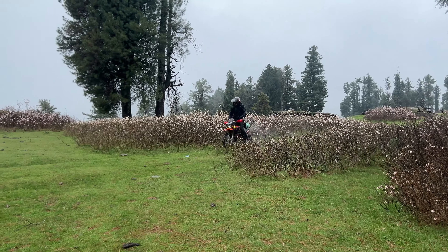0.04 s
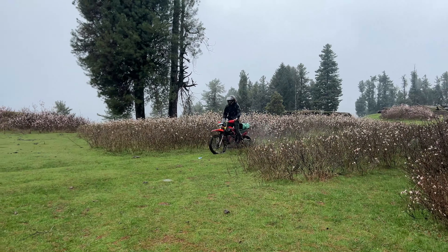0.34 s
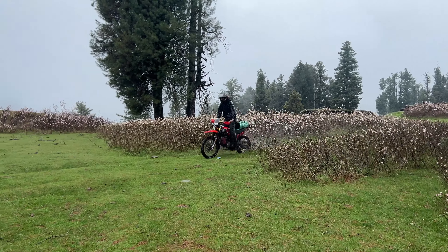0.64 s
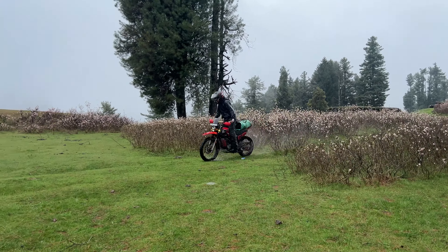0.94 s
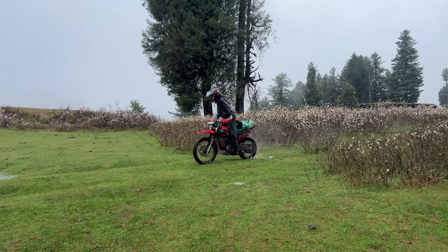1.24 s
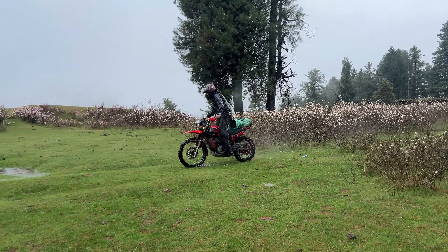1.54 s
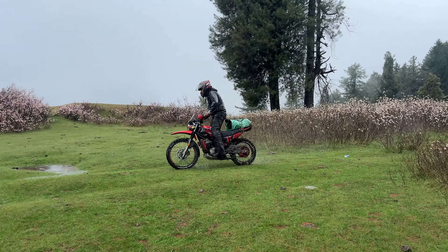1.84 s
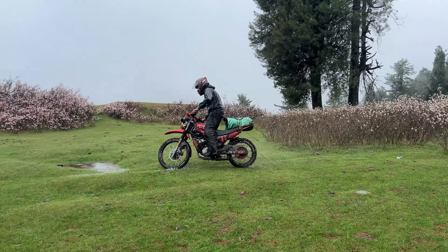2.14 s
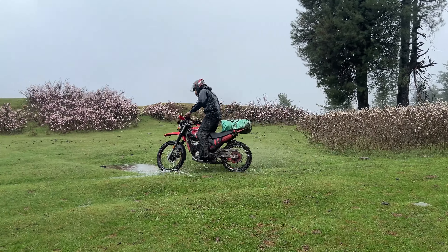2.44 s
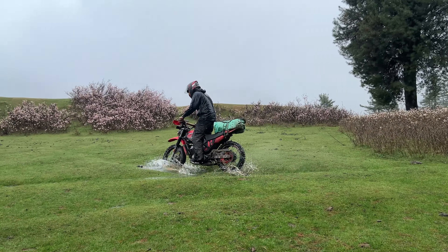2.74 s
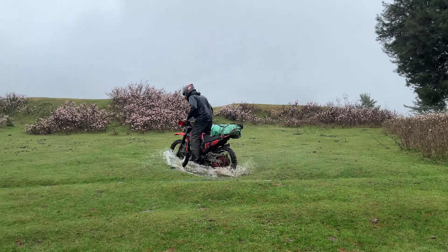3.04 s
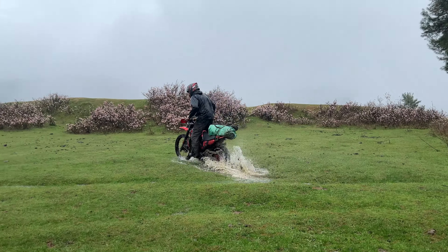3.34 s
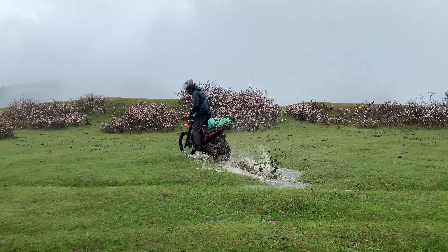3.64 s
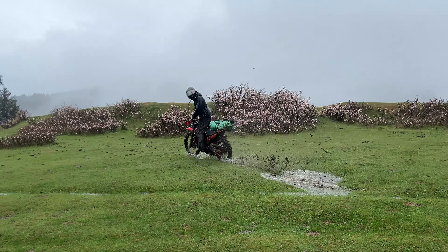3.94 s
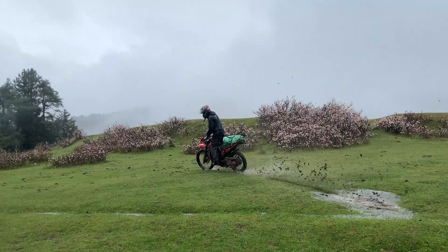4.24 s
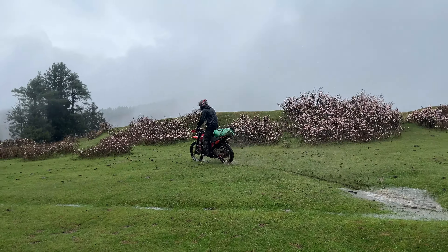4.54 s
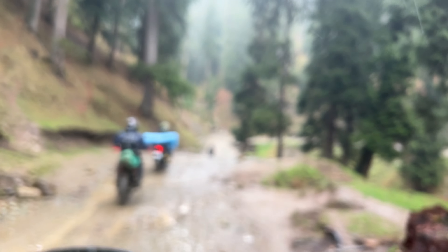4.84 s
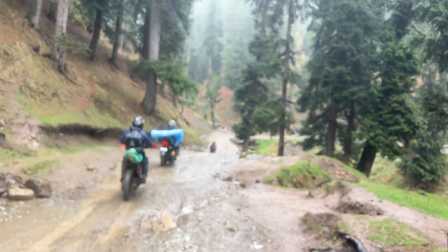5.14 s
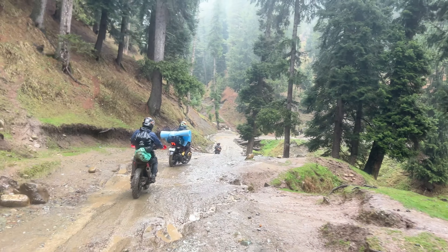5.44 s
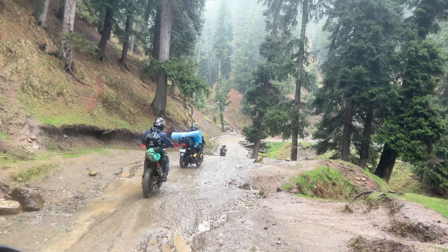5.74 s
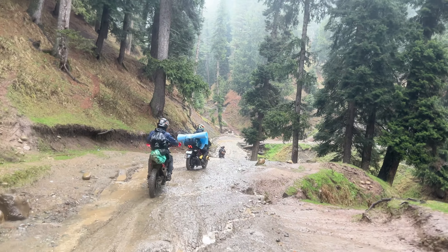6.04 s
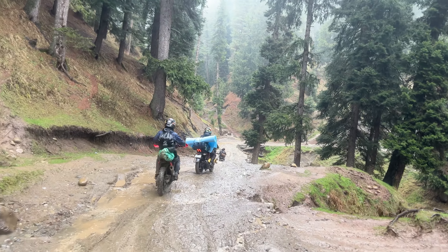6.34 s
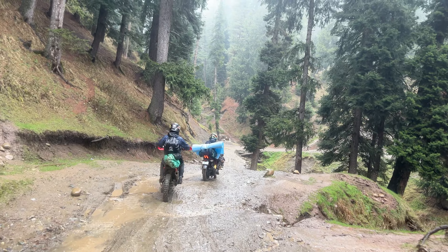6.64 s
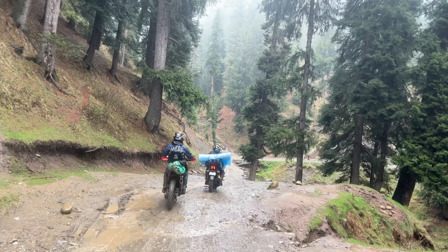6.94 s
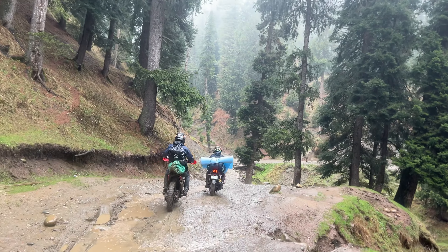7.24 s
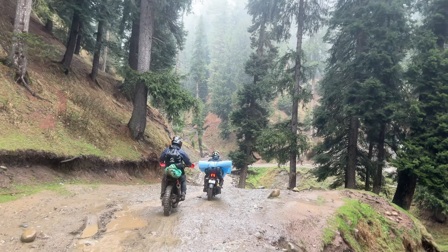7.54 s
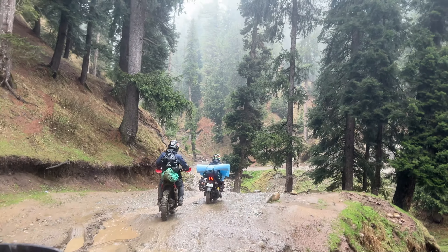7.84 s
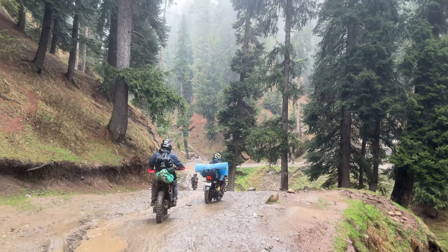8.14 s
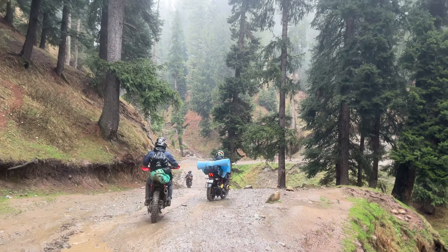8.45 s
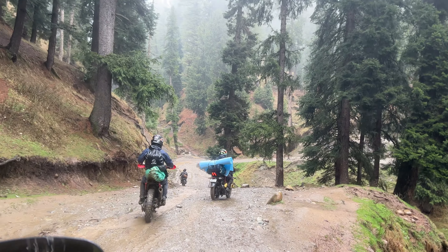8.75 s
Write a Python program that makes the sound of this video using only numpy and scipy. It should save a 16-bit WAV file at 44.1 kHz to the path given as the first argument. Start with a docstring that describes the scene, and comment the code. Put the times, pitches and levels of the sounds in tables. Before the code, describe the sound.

A dirt bike blips its throttle and revs hard through a puddle, then quieter motorcycles chug along a wet, stony trail.

```python
"""A meadow: a single-cylinder trail bike blips its throttle, opens up through a puddle and rolls off.
Then a stony forest trail: a bike plods along while another idles close by, and stones knock under
the tyres over a wash of water and wet gravel. Every firing is a puff that the silencer smears into
a quick downward chirp; an open throttle adds a sharp crack, a throaty growl and a metallic rasp."""
import sys
import numpy as np
from scipy import signal
from scipy.fft import rfft, irfft
from scipy.io import wavfile
from scipy.ndimage import uniform_filter1d

SR = 44100
rng = np.random.default_rng(int(sys.argv[2]) if len(sys.argv) > 2 else 0)


def wav_record(signal):
    """Record a signal, one row per channel, as 16-bit PCM in the file named by sys.argv[1]."""
    frames = np.transpose(np.atleast_2d(signal))
    bounded = np.clip(frames, -1, 1)
    # unit amplitude maps onto the largest positive 16-bit level
    quanta = np.round(bounded * 32767).astype(np.int16)
    wavfile.write(sys.argv[1], SR, quanta)


N = 396900
TIME, HZ = np.arange(N) / SR, np.fft.rfftfreq(N, 1 / SR)
TRAIL_AT_S, TRAIL_EASE_S = 4.644, 5.58  # the trail scene starts; its plodding bike eases off

# Twists of the throttle: (opens [s], shuts [s], opening rate [firings/s], shutting rate [firings/s],
# load [dB], hot-gas pitch lift [share], extra boom [dB])
THROTTLE_TWISTS = [(-0.1, 0.369, 31.87, 30.74, -11, .1, 4.5), (0.767, 0.971, 19.7, 37.01, -20, 0.015, 0.5),
                   (1.15, 1.371, 33.99, 29.28, -21, .06, 1), (1.638, 1.855, 20.87, 35.12, -8, .09, 3.5),
                   (2.084, 2.275, 26.39, 26.49, -12, .035, 4), (2.452, 2.601, 20.67, 27.4, -9, .045, 2.5),
                   (2.742, 4.065, 23.24, 70.69, 0, .067, 0)]
def throttle(t):
    """The rider's hand at times t: opening 0-1, then the load, lift and boom of the latest twist."""
    late_s, open_s, shut_s = 0.0046, 0.024, 0.022  # the exhaust answers a little late
    opening = sum(ramp(t, opens + late_s, open_s) - ramp(t, shuts + late_s, shut_s)
                  for opens, shuts, *_ in THROTTLE_TWISTS)
    starts, _, _, _, *character = np.transpose(THROTTLE_TWISTS)
    return opening, *np.array(character)[:, np.searchsorted(starts, t) - 1]

# Revs through the last, long pull and the coast after it: (time [s], rate [firings/s])
LONG_PULL_REVS = [(2.888, 36.12), (2.97, 39.56), (3.05, 41.75), (3.13, 47.68), (3.21, 52.63), (3.3, 51.52),
                  (3.38, 53.99), (3.46, 56.36), (3.56, 60.64), (3.7, 68.54), (3.74, 69.28), (3.84, 72.49),
                  (3.94, 75.73), (4.01, 73.03), (4.13, 65.13), (4.2, 59.58), (4.28, 54.33), (4.38, 48.1),
                  (4.5, 42.38), (4.64, 36.4)]
def meadow_revs():
    """The meadow bike's rev curve: straight lines between throttle moves, then the long pull."""
    opens, shuts, opening_rate, shutting_rate, *_ = np.transpose(THROTTLE_TWISTS)
    return sorted([*zip(opens, opening_rate), *zip(shuts, shutting_rate), *LONG_PULL_REVS])

# The silencer's low, middle and upper voices: (frequency [Hz], level [dB])
BOOM_EQ = [(20, -52.5), (36, -26), (52, 0.5), (75, -2), (105, 8), (130, -5.5), (170, -30), (300, -80)]
BODY_EQ = [(55, -28), (105, -1.5), (150, 12.5), (210, 12), (250, -0.5), (295, -44.5), (380, -54.5),
           (700, -75)]
BARK_EQ = [(150, -26), (250, 8.5), (300, 0), (370, 0.5), (490, -10), (630, -7.5), (760, -38.5),
           (1300, -59.5)]
# Exhaust mix, throttle open and shut: (rate [firings/s], boom [dB], body [dB], bark [dB], crack [dB])
OPEN_MIX = [(24.2, -19.5, -21, -23, -36.5), (30.5, -22.5, -15.5, -21, -35.5), (36.5, -43, -12.5, -23, -29),
            (40.9, -19, -12.5, -21.5, -25), (54.1, -17.5, -15.5, -19, -19.5),
            (51.2, -22.5, -17.5, -19.5, -24), (69, -14.5, -19.5, -23, -22.5)]
SHUT_MIX = [(21.4, -23, -23.5, -64.5, -75.5), (27.4, -16.5, -23.5, -41.5, -68.5),
            (39.6, -24, -19.5, -54.5, -63), (46.3, -29.5, -17.5, -34, -52.5),
            (65.7, -31.5, -18.5, -31, -34)]
# Off the throttle the note sinks with the revs: (rate [firings/s], pitch lift [share])
OVERRUN_LIFT = [(22, -0.052), (36, 0.0033), (48, 0.039), (68, 0.22)]
# At first the bike sounds thin and faint; its bass drops away, then returns:
# (time [s], low cut [Hz], level [dB])
BASS_THINNING = [(0.0, 62, -13), (0.2, 244, -9.5), (0.39, 380, -7.5), (0.58, 364, -3.5), (0.68, 120, -14.5),
                 (0.78, 133, -12.5), (0.86, 55, 3), (1.3, 115, -1.5), (1.7, 19, -0.5)]
def exhaust(s, rate, pop_s=4.085, pop_fade_s=0.026, ease_s=3.964, misfire_s=4.16):
    """Revs and throttle voice each firing; returns the mono pipe note and the stereo crack."""
    opening, load_db, hot_lift, boom_db = throttle(s)
    shut = 1 - opening
    mix_db = opening * np.array(follow(OPEN_MIX, rate)) + shut * np.array(follow(SHUT_MIX, rate))
    boom, body, bark, crack_db = mix_db
    cut_hz, thin_db = follow(BASS_THINNING, s)
    blipping = opening * (s < THROTTLE_TWISTS[-1][0])
    cut_hz = np.maximum(cut_hz, 102 * blipping)  # short blips lack the deepest bass
    pop = (s > pop_s) * np.exp(-abs(s - pop_s) / pop_fade_s)  # hollow pop as the throttle snaps shut
    lift = opening * hot_lift + shut * (follow(OVERRUN_LIFT, rate)[0] + 0.038 * pop)
    uneven_db = np.interp(rate, [22, 55], [1.0, .4])  # firing steadies with speed
    lag_scale = np.interp(rate, [22, 36, 70], [1.05, .97, .85])  # hot gas carries sound faster
    fader_db = thin_db - 5.5 * ramp(s, ease_s, pop_s - ease_s) * (s < pop_s)  # the pull slackens
    misfire_db = -9 * (np.arange(len(s)) == np.searchsorted(s, misfire_s))  # one firing nearly fails
    voices_db = np.array([boom + opening * boom_db, body + 2 * pop, bark + opening * load_db + 2 * pop])
    voices_db += fader_db + misfire_db
    pipe = silencer(s, rate, voices_db, (BOOM_EQ, BODY_EQ, BARK_EQ), uneven_db, lag_scale, lift, cut_hz)
    blow_db = fader_db + 2.7 * load_db
    sharp = crack(s, rate, blow_db + crack_db)
    drive_db = blow_db - 28 * shut  # the pipe grows quiet once the throttle shuts
    for layer in (growl, throat, spit, bray):
        pipe += layer(s, rate, drive_db)
    return pipe, sharp

# The silencer lets low notes out late: (frequency [Hz], base delay [ms])
SILENCER_LAG = [(50, 15.22), (100, 22.7), (140, 9.9), (210, 7.7), (320, 3.55), (500, 1.58), (900, 1.1)]
def silencer(times, rates, levels_db, voices, uneven_db, lag_scale, lift, cut_hz, size=4096):
    """Each firing excites three broad resonances; low notes lag, so the puff chirps downward."""
    hz, out = np.fft.rfftfreq(size, 1 / SR), np.zeros(N)
    shapes = np.array([amp(read(voice, hz)) for voice in voices])
    shapes /= np.sqrt(2 * (shapes ** 2).sum(1, keepdims=True) / size)
    phase = 2 * np.pi * np.cumsum(read(SILENCER_LAG, hz) / 1000) * hz[1]
    chance = rng.standard_normal((len(times), 4))
    wobble_db = np.reshape(uneven_db, (-1, 1)) * (chance[:, :1] + .5 * chance[:, 1:])
    gains = amp(np.transpose(levels_db) + wobble_db)
    per_firing = np.broadcast_arrays(times, rates, lag_scale, lift, cut_hz)
    for gain, s, rate, lag, up, cut in zip(gains, *per_firing):
        spectrum = np.interp(hz / (1 + up), hz, gain @ shapes)
        spectrum /= np.sqrt(1 + (cut / (hz + 1)) ** 8)  # low cut
        puff = np.roll(irfft(spectrum * np.exp(-1j * lag * phase)), size // 4)
        add(out, s - size / 4 / SR, puff * np.sqrt(SR / rate))
    return out

# How much of the burst is jet noise: (rate [firings/s], turbulence [share])
JET_SHARE = [(28, 0.6), (39, 0.7), (50, 0.61), (72, 0.07)]
def blowdown(times, rates, levels_db, decay_cycles=0.16, echo=0.27, uneven_db=.5):
    """The exhaust valve opens: a shock that scatters alike each time, and a jet of fresh turbulence."""
    ms, out = np.arange(1024) * 1000 / SR, np.zeros(N)
    shock = rng.standard_normal(len(ms)) * np.exp(-ms / 1.74)
    for _ in range(12):  # the pipe smears the shock briefly and leaves its spectrum flat
        scatter = rfft(shock)
        shock = irfft(scatter / abs(scatter)) * np.exp(-ms / 8)
    for s, rate, db, rough in zip(times, rates, levels_db, *follow(JET_SHARE, rates)):
        decay_ms = 1000 * decay_cycles / rate
        age = ms / decay_ms
        jet = unit(rng.standard_normal(len(ms)) * np.sqrt(age) * np.exp(-age))
        second_shock = echo * np.interp(ms - 1.1 * decay_ms, ms, shock, left=0)
        burst = np.sqrt(1 - rough) * unit(shock + second_shock) + np.sqrt(rough) * jet
        jitter_ms = .045 * rng.standard_normal()  # uneven combustion blurs the top harmonics
        start = s + (jitter_ms - .65 * decay_ms) / 1000
        gain = amp(db + 1 + uneven_db * rng.standard_normal())
        add(out, start, gain * burst * np.sqrt(SR / rate / len(ms)))
    return out

# The rough edge of the exhaust note: (frequency [Hz], level [dB])
CRACK_EQ = [(280, -21.5), (500, -3), (660, -1), (830, -9), (1020, -21), (1320, 3), (1620, -4.5),
            (1860, -1.5), (2060, -5), (2300, -10), (2900, -12), (3500, -12.5), (4200, -13.5), (5100, -27),
            (6400, -41), (9400, -36.5), (13000, -33.5), (16000, -27.5)]
def crack(times, rates, levels_db, trim_db=-2.5):
    """Two trains of blow-down shocks, coloured by the pipe and spread wide."""
    trains = [blowdown(times, rates, levels_db) for _ in range(2)]
    return diffuse(*[amp(trim_db) * colour(shocks, CRACK_EQ) + rasp(shocks) for shocks in trains])

# Metallic rings of the exhaust: (time [s], lower [Hz], level [dB], upper [Hz], level [dB])
RASP_SWEEP = [(3.1, 3250, -7, 4630, -4), (3.33, 3930, 3, 4600, 4), (3.48, 3610, 8, 4900, -17),
              (3.62, 3780, 2, 4670, 2), (3.78, 3440, 0.5, 4820, 3), (3.92, 3730, 12, 5030, 4.5),
              (4.03, 4000, -3, 5000, -14)]
def rasp(shocks, widths_hz=(520, 750)):
    """The shocks excite two metallic resonances that shift and swell through the long pull."""
    lower_hz, lower_db, upper_hz, upper_db = follow(RASP_SWEEP)
    rings = zip((lower_hz, upper_hz), widths_hz, (lower_db, upper_db))
    metal = sum(amp(db) * resonate(shocks, hz, width) for hz, width, db in rings)
    return signal.sosfilt(signal.butter(10, 5400, fs=SR, output="sos"), metal)

# The growl's tone: (frequency [Hz], level [dB]), and its drive: (rate [firings/s], level [dB])
GROWL_EQ = [(330, -37), (480, 3.5), (640, -7.5), (780, -22), (930, -26), (1150, -31), (3000, -73.5)]
GROWL_BY_REVS = [(28, -50), (42, -32.5), (53, -35.5), (60, -39.5), (75, -40)]
def growl(times, rates, drive_db, early_s=0.0025):
    """Clean pressure pulses ring the pipe's throaty resonances, most at mid revs."""
    levels_db = drive_db + follow(GROWL_BY_REVS, rates)[0]
    return colour(pulse_train(times - early_s, rates, levels_db), GROWL_EQ)

# The pipe's vowel in the long pull: (time [s], lower [Hz], level [dB], upper [Hz], level [dB])
THROAT_SWEEP = [(2.7, 417, -43, 960, -45), (2.9, 404, -23.5, 693, -28.5), (3.12, 640, -31.5, 850, -36),
                (3.25, 566, -30.5, 677, -27.5), (3.4, 512, -23.5, 667, -24), (3.5, 580, -32.5, 840, -30),
                (3.7, 619, -26.5, 860, -41), (4, 625, -32.5, 830, -47), (4.2, 690, -24, 895, -22),
                (4.55, 565, -30, 800, -32)]
def throat(times, rates, drive_db, widths_hz=(170, 150)):
    """Pulses ring two pipe resonances that wander as the gas heats and the revs climb."""
    pulses = pulse_train(times, rates, drive_db)
    lower_hz, lower_db, upper_hz, upper_db = follow(THROAT_SWEEP)
    rings = zip((lower_hz, upper_hz), widths_hz, (lower_db, upper_db))
    return sum(amp(db) * np.sqrt(SR / 2 / width) * resonate(pulses, hz, width) for hz, width, db in rings)

# The bray's tone: (frequency [Hz], level [dB]), and its drive: (rate [firings/s], level [dB])
BRAY_EQ = [(900, -38), (1120, -17), (1320, 5.5), (1500, 1.5), (1650, -9.5), (1850, 7.5), (2060, -5),
           (2300, -21), (4000, -46.5)]
BRAY_BY_REVS = [(28, -47), (40, -28.5), (50, -25), (75, -22.5)]
def bray(times, rates, drive_db, early_s=0.001565):
    """A hard, pitched bray at full throttle: clean pulses ring the pipe's upper resonances."""
    levels_db = drive_db + follow(BRAY_BY_REVS, rates)[0]
    return colour(pulse_train(times - early_s, rates, levels_db), BRAY_EQ)

def spit(times, rates, drive_db, trim_db=-23, decay_ms=1.0, early_s=0.0024, uneven_db=2.5):
    """Under full load each firing starts with a hard, uneven snap that fades at top revs."""
    ms, out = np.arange(400) * 1000 / SR, np.zeros(N)
    for s, db in zip(times, drive_db - 15 * ramp(rates, 56, 10)):
        snap = rng.standard_normal(len(ms)) * np.exp(-ms / decay_ms)
        add(out, s - early_s, amp(trim_db + db + uneven_db * rng.standard_normal()) * snap)
    return colour(out, [(400, -17), (1000, 7.5), (2000, 0), (5000, 3.5), (6300, -26), (9500, -11),
                        (12500, -12), (15000, -7)])

# The plodding bike's revs: (time [s], rate [firings/s])
PLOD_REVS = [(4.644, 19.3), (5.619, 20.67), (5.831, 23.03), (6.098, 18.04), (6.526, 17.65), (6.853, 19.05),
             (7.585, 18.35), (8.404, 15.31), (9.0, 16.35)]
# Its silencer's middle and upper voices: (frequency [Hz], level [dB])
PLOD_BODY_EQ = [(70, -21), (115, 0), (165, -4), (230, 1.5), (300, -16), (600, -62)]
PLOD_BARK_EQ = [(150, -11), (250, 0), (350, -1), (430, -4.5), (520, -15), (700, -17), (1300, -64)]
# A low boom swells now and then on the trail: (time [s], half-length [s], boost [dB])
BOOM_SWELLS = [(5.33, 0.04, 10), (5.555, 0.066, 11), (7.248, 0.32, 4), (7.73, 0.26, 13)]
def plodding_bike(pulling_db=(-36.5, -41, -43), eased_db=(-41, -44, -49.5), lope_s=7.82):
    """A bike pulls at low revs, eases off, then lopes: it fires strong and weak by turns."""
    s, rate = firings(PLOD_REVS)
    eased = ramp(s, TRAIL_EASE_S, 0.14)
    boom, body, bark = np.outer(pulling_db, 1 - eased) + np.outer(eased_db, eased)
    swell_db = sum(db * np.exp(-((s - at) / half) ** 2) for at, half, db in BOOM_SWELLS)
    alternate = (np.arange(len(s)) - np.searchsorted(s, lope_s)) % 2 == 0
    lope_db = alternate * np.where(s > lope_s, -6, 0.5)
    coast_db = -5 * ((s > 5.74) & (s < 6.02))  # the throttle shuts for a moment
    levels_db = lope_db + np.array([boom + swell_db, body, bark + coast_db])
    voices = BOOM_EQ, PLOD_BODY_EQ, PLOD_BARK_EQ
    return silencer(s, rate, levels_db, voices, uneven_db=1.8, lag_scale=1.0, lift=0.003, cut_hz=56)

# The wavering idle: (time [s], rate [firings/s])
IDLE_REVS = [(4.644, 10.65), (5.2, 9.92), (5.6, 9.37), (6, 11.28), (6.4, 10.68), (6.9, 9.92), (7.3, 10.09),
             (7.7, 11.43), (8.15, 9.61), (8.6, 11.43), (9, 11.49)]
# Its hollow chuff: (frequency [Hz], level [dB])
CHUFF_EQ = [(300, -48.5), (560, 5.5), (720, -37), (830, 12.5), (910, 12), (1090, -19), (1330, 4.5),
            (1700, -21), (5000, -12), (6500, -38), (15000, -42)]
def idling_bike(thud_db=-34.5, chuff_db=-45.5, ring_db=-53.5, chuff_delay_s=.062):
    """A soft thud at each firing and a hollow chuff after it; the engine case rings on in between."""
    s, _ = firings(IDLE_REVS, start=.15)
    clicks = np.zeros(N)
    clicks[(s * SR).astype(int)] = amp(1.3 * rng.standard_normal(len(s)))
    thud = colour(clicks, [(20, -18.5), (42, -28.5), (56, 1), (68, 7.5), (85, -3), (120, -10.5),
                           (250, -30), (900, -72)])
    thud *= amp(thud_db) / thud[TIME > TRAIL_AT_S].std()
    chuff = colour(bursts(s + chuff_delay_s, decay_ms=11), CHUFF_EQ)
    chuff *= amp(chuff_db + np.interp(TIME, [6, 6.5], [-4, 0]))  # it grows clearer
    case_eq = [(300, -63), (1100, -4), (1340, 5.5), (1500, -1), (1800, -29), (6000, -46)]
    ring = amp(ring_db) * colour(bursts(s, decay_ms=33), case_eq)
    return thud + chuff + ring + tappets(s)

def tappets(s, level_db=-56, shut_s=0.026):
    """The idling engine's valves tick as they open and shut, a little unevenly."""
    times = np.r_[s, s + shut_s] + .002 * rng.standard_normal(2 * len(s))
    eq = [(600, -17), (1400, 1), (2400, -4.5), (4800, -1.5), (6500, -22), (9000, -16), (16000, -14)]
    return amp(level_db) * colour(bursts(times, decay_ms=5), eq)

# Stone hits: (time [s], level [dB], ring [Hz], knock re ring [dB], tick re ring [dB], lean left [dB])
STONE_HITS = [(5.556, -27, 1800, -16, -9, 7), (5.653, -21, 840, -3, -15, 12),
              (5.955, -16, 850, -10, -18, 5), (6.044, -14, 830, -10, -17, 3),
              (6.28, -28, 2820, -25, -20, 0), (6.508, -24, 1840, -10, -19, 9),
              (6.72, -17.5, 1300, -39, -2.5, -3), (6.835, -33, 1700, -25, -14, 0),
              (6.854, -28, 4130, -30, -16, 0), (6.989, -34, 690, -10, -20, 0),
              (7.963, -27, 3840, -25, -9, 0), (8.247, -29, 1900, -26, -1, 0),
              (8.571, -10, 1780, -4, -6.5, 12.5)]
def stones(hollow_hz=680, ring_t60=0.013, hollow_t60=0.019, tick_t60=0.009):
    """A tyre flicks a stone: a tick, a short ring and a hollow knock that builds just after."""
    t, out = np.arange(2048) / SR, np.zeros((2, N))
    for s, db, hz, hollow_db, tick_db, left_db in STONE_HITS:
        ring = np.sin(2 * np.pi * hz * t) * amp(-60 * t / ring_t60)
        hollow = 2 * np.sin(2 * np.pi * hollow_hz * t)
        hollow *= ramp(t, 0, 0.0037) * amp(hollow_db - 60 * t / hollow_t60)
        tick = signal.lfilter(*signal.butter(4, 4500, fs=SR), 2 * rng.standard_normal(len(t)))
        tick *= amp(tick_db - 60 * t / tick_t60)
        hit = amp(db) * ramp(t, 0, .0005) * (ring + hollow + tick)
        add(out[0], s, hit)
        add(out[1], s, amp(-left_db) * hit)
    return out

# The meadow bike's running gear: (frequency [Hz], level [dB])
CLATTER_EQ = [(40, 5), (200, 11), (600, 3.5), (1000, 0), (1400, 5.5), (1650, -3), (1900, 1.5), (2400, -2),
              (4000, -0.5), (5100, -5.5), (6200, -25.5), (8000, -21.5), (16000, -22.5)]
def clatter(s, base_db=-40, db_per_octave=5, open_db=3, nearest_s=2.45, pass_s=1.1):
    """Chain, valves and tyres: a rush that pulses with each firing and swells as the bike passes."""
    rushes = [0.68 * rng.standard_normal(N) + 0.4 * bursts(s, decay_ms=2.5) for _ in range(2)]
    pair = diffuse(*[colour(rush, CLATTER_EQ) for rush in rushes])
    # a narrow band near 1.2 kHz is missing for the first second
    pair = notch(pair, hz=1196, width_hz=256, depth=1 - ramp(TIME, 1.0, 0.15))
    octaves = np.log2(follow(meadow_revs())[0] / 30)
    fade_in_db = -5 * (1 - ramp(TIME, 0.15, 0.53))
    db = base_db + db_per_octave * octaves + open_db * throttle(TIME)[0] + fade_in_db
    return amp(db) * pair / np.hypot(1, (TIME - nearest_s) / pass_s)

def chain_rasp(s, level_db=-53, tighten_s=.09):
    """The drive chain rasps when the throttle pulls it tight."""
    tension = uniform_filter1d(throttle(TIME)[0], int(tighten_s * SR)) * ramp(TIME, 0.32, 0.27)
    eq = [(600, -19), (950, 8), (1150, -7.5), (1400, 4.5), (1650, -1), (1900, 8.5), (2500, -6),
          (3700, 2.5), (4900, -2), (6200, -39.5), (16000, -18)]
    return amp(level_db) * tension * diffuse(*[colour(bursts(s, decay_ms=4), eq) for _ in range(2)])

def pull_rush(level_db=-46.5):
    """A rough rush while the plodding bike pulls, fading as it eases off."""
    eq = [(300, -31.5), (480, -6), (580, 6.5), (680, -7.5), (900, -45)]
    return amp(level_db) * colour(rng.standard_normal(N), eq) * (1 - ramp(TIME, TRAIL_EASE_S, 0.95))

def splash(level_db=-50):
    """Drops thrown up by the wheels patter back into the puddle."""
    drops = impacts(per_s=90, spread_db=6)
    splat = rng.standard_normal(400) * np.exp(-np.arange(400) / 80)
    spray = unit(signal.oaconvolve(drops, splat)[:N])
    eq = [(600, -19), (2000, -17), (5000, -2.5), (6500, -2), (9500, -9), (15000, -1)]
    return amp(level_db) * colour(spray, eq) * swell(peak_s=3.44, width_s=0.34)

def grass_swish(level_db=-51):
    """The tyres hiss through wet grass."""
    eq = [(500, -26.5), (2500, -12.5), (4300, 6), (5200, 0), (6200, -35.5), (16000, -18.5)]
    hiss = diffuse(*[colour(rng.standard_normal(N), eq) for _ in range(2)])
    return amp(level_db) * hiss * swell(peak_s=1.7, width_s=0.36)

def gravel(base_db=-57, grain_s=0.0071, bands=8):
    """Wet gravel crunches in large and small grains, each in its own band, loudest on a wetter stretch."""
    t, pair = np.arange(2048) / SR, np.zeros((2, N))
    edges_hz = np.linspace(1000 ** .5, 16000 ** .5, bands + 1) ** 2
    for band in zip(edges_hz, edges_hz[1:]):
        grains = signal.oaconvolve(impacts(per_s=30, spread_db=3), t * np.exp(-2 * t / grain_s))[:N]
        bandpass = signal.butter(2, band, "band", fs=SR, output="sos")
        pair += signal.sosfilt(bandpass, grains * rng.standard_normal((2, N)))
    eq = [(400, -5), (1400, 11), (2300, 15), (4800, 13.5), (6600, -13.5), (8100, 2), (9300, -1.5),
          (16000, 2.5)]
    crunch = diffuse(*[colour(unit(side), eq) for side in pair])
    return amp(base_db) * crunch * (1.31 + swell(peak_s=7.25, width_s=0.55))

# The trail's watery bed: (frequency [Hz], level [dB])
WASH_EQ = [(35, -8), (100, 26.5), (300, 9.5), (560, 12.5), (730, 19.5), (1100, 2), (1350, 3), (2200, 4),
           (5000, 2.5), (6700, -22.5), (8100, -9), (9300, -14), (16000, -15)]
def water_wash(level_db=-42, flutter_db=0.37, grit_per_s=100):
    """Running water and gravel: gritty, faintly fluttering noise that loses a narrow band partway."""
    grit = (rng.random((2, N)) < grit_per_s / SR) * rng.standard_normal((2, N))
    wash = diffuse(*[colour(rng.standard_normal(N) + 0.52 * unit(side), WASH_EQ) for side in grit])
    wash = notch(wash, hz=703, width_hz=51, depth=ramp(TIME, 6, 0.18))
    flutter = unit(irfft(rfft(rng.standard_normal(N)) * (HZ < 9), N))
    return amp(level_db + flutter_db * flutter) * wash

def outdoors(x, wet_db, t60):
    """Centred direct sound and its scatter from ground and trees."""
    t = np.arange(SR // 2) / SR
    tails = rng.standard_normal((2, len(t))) * amp(-60 * t / t60) * (t > .006)
    tails /= np.linalg.norm(tails, axis=1, keepdims=True)
    return x + amp(wet_db) * diffuse(*signal.fftconvolve(x[None], tails, axes=1)[:, :N])

# How alike diffuse sound is left and right: (frequency [Hz], coherence [0-1])
STEREO_COHERENCE = [(60, 0.89), (700, 0.88), (1400, 1), (1950, 0.98), (2300, 0.2), (3200, 0.29),
                    (3900, 0.58), (4600, 0.9), (6000, 0.24), (9300, 0.18), (9900, 1), (11000, 1),
                    (12000, 0.24), (13300, 1), (16000, 0.75)]
def diffuse(a, b):
    """Two unrelated sounds become a pair that agrees only in part."""
    same = read(STEREO_COHERENCE)
    return np.array([a, irfft(same * rfft(a) + np.sqrt(1 - same ** 2) * rfft(b), N)])

def firings(revs, start=.5):
    """Times at which the engine fires, the first one `start` cycles in, and the firing rate there."""
    t = TIME[(revs[0][0] <= TIME) & (TIME <= revs[-1][0])]
    cycles = np.cumsum(follow(revs, t)[0]) / SR
    s = np.interp(np.arange(start, cycles[-1]), cycles, t)
    return s, follow(revs, s)[0]

def pulse_train(times, rates, levels_db):
    """One clean pulse for each firing."""
    pulses = np.zeros(N)
    pulses[np.maximum(times * SR, 0).astype(int)] = amp(levels_db) * np.sqrt(SR / rates)
    return pulses

def bursts(times, decay_ms):
    """Noise that flares at each time and dies away, at rms 1 while it sounds."""
    gate, t = np.zeros(N), np.arange(4096) / SR
    for s, size in zip(times, rng.lognormal(0, 0.1, len(times))):
        add(gate, s, size * t * np.exp(-t * 1000 / decay_ms))
    return gate / np.sqrt(np.mean(gate[gate > 0] ** 2)) * rng.standard_normal(N)

def impacts(per_s, spread_db):
    """Random clicks, many small and a few large."""
    return (rng.random(N) < per_s / SR) * amp(spread_db * np.minimum(rng.exponential(1, N), 3))

def colour(x, eq, size=8192):
    """Minimum-phase EQ of unit power gain through (frequency [Hz], level [dB]) points."""
    gain = unit(amp(read(eq, np.fft.rfftfreq(size, 1 / SR))))
    log_gain = np.log(np.r_[gain, gain[-2:0:-1]])
    response = np.exp(np.conj(signal.hilbert(log_gain)))[:len(gain)]
    return signal.oaconvolve(x, irfft(response))[:N]

def resonate(x, hz, width_hz):
    """Two resonators of gain 1 in series, their centre following the curve hz."""
    turn, r = np.exp(2j * np.pi * np.cumsum(hz) / SR), np.exp(-np.pi * width_hz / SR)
    for _ in range(2):
        x = 2 * (turn * signal.lfilter([1 - r], [1, -r], x / turn + 1e-18)).real
    return x

def notch(x, hz, width_hz, depth):
    """Scoops out a narrow band; depth is a 0-1 curve over time."""
    return x - depth * irfft(rfft(x) * np.exp(-((HZ - hz) / width_hz) ** 2), N)

def follow(table, t=TIME):
    """A table's later columns, interpolated at t along its first."""
    axis, *columns = np.transpose(table)
    return [np.interp(t, axis, column) for column in columns]

def read(points, hz=HZ):
    """A spectrum table on a log-frequency axis."""
    f, value = np.transpose(points)
    return np.interp(np.log(hz + 1), np.log(f + 1), value)

def add(mix, s, sound):
    """Drops a sound into the mix at s seconds."""
    start = int(round(s * SR))
    sound = sound[max(-start, 0):]
    part = mix[max(start, 0):][:len(sound)]
    part += sound[:len(part)]

def swell(peak_s, width_s):
    return np.exp(-.5 * ((TIME - peak_s) / width_s) ** 2)

def ramp(t, start, length):
    return np.clip((t - start) / length, 0, 1)

def amp(db):
    return 10 ** (np.asarray(db) / 20)

def unit(x):
    return x / np.sqrt(np.mean(x ** 2) + 1e-20)

def meadow():
    """The revving bike: exhaust, puddle, running gear and wet grass."""
    s, rate = firings(meadow_revs())
    pipe, sharp = exhaust(s, rate)
    scattered = outdoors(pipe + splash(), wet_db=-16, t60=.2)
    return scattered + sharp + clatter(s) + chain_rasp(s) + grass_swish()

def trail():
    """Two engines and stones over water and wet gravel."""
    bed = water_wash()
    near = pull_rush() + idling_bike() + stones()  # close by, so without scatter
    return outdoors(plodding_bike(), wet_db=-4.5, t60=0.068) + near + bed + gravel()

def scene():
    """The meadow, then a hard cut to the trail."""
    on_trail = ramp(TIME, TRAIL_AT_S, 0.002)
    return (1 - on_trail) * meadow() + on_trail * trail()

# Treble ring on both sides: (frequency [Hz], level [dB])
TREBLE_RING = [(9300, 0), (9900, 6), (11300, 0.5), (14200, -2), (15500, 3.5)]
# Shading of the right side: (frequency [Hz], cut [dB]), and its lag: (frequency [Hz], phase [rad])
RIGHT_SHADE = [(60, 2), (200, -0.5), (330, -2), (750, 5.5), (1750, 3.5), (2200, 12.5), (2600, 14),
               (3200, 14.5), (3800, 19.5), (4600, 19), (5300, 22), (6300, -1), (7300, 5), (8400, 5.5),
               (9400, -4.5), (16000, 3.5)]
RIGHT_LAG = [(150, 0), (400, 0.67), (700, 2.5), (1050, 5), (1700, 5), (2300, 8), (2800, 7.5), (3600, 12.5),
             (4000, 11.5), (5100, 2.5), (5400, 4), (6200, 5), (6500, -4), (8000, 7.5), (9900, 3.5),
             (11000, 3.5), (12600, 0.5), (14400, -0.3), (15700, -3)]
def record(dry, ceiling=.95, top_hz=15950):
    """The treble rings, the right side lags and is shaded, peaks are rounded and the very top is cut."""
    right = amp(-read(RIGHT_SHADE)) * np.exp(-1j * read(RIGHT_LAG))
    pair = irfft(rfft(dry) * amp(read(TREBLE_RING)) * np.array([np.ones(len(HZ)), right]), N)
    pair = pair / (1 + (pair / ceiling) ** 8) ** (1 / 8)
    lowpass = signal.firwin(511, top_hz, window=("kaiser", 9), fs=SR)
    return signal.oaconvolve(pair, lowpass[None], "same")

dry = scene()
out = record(dry)
wav_record(out)
```